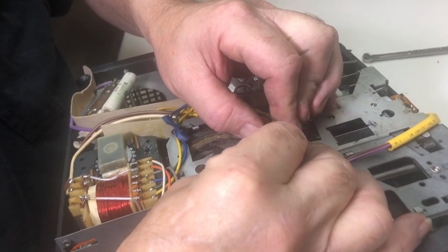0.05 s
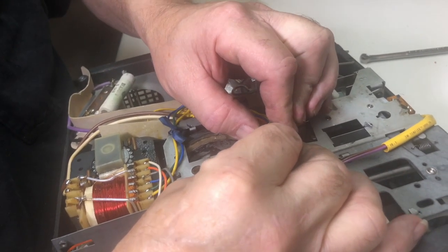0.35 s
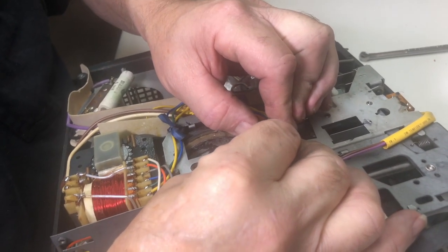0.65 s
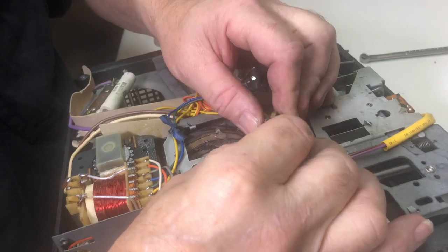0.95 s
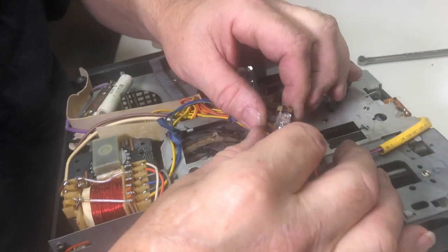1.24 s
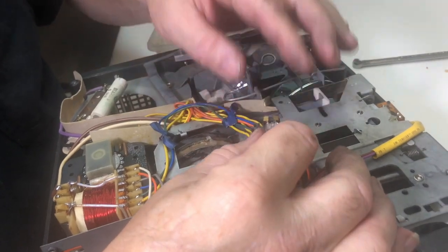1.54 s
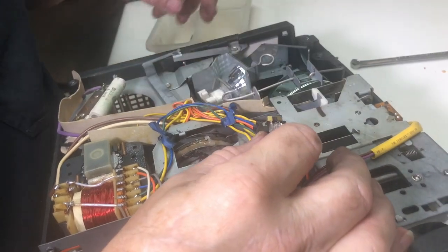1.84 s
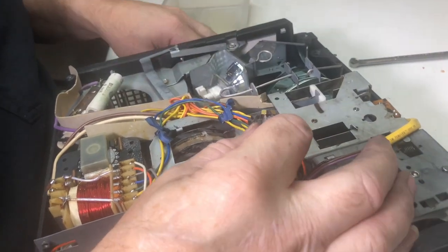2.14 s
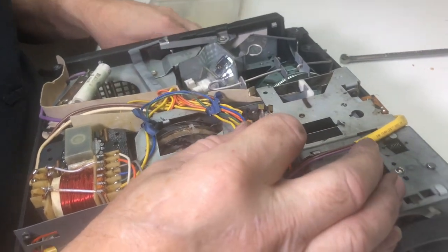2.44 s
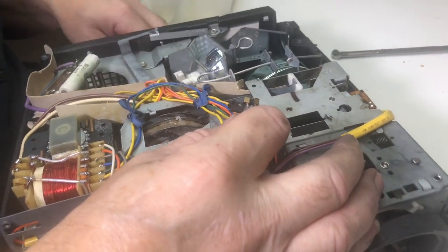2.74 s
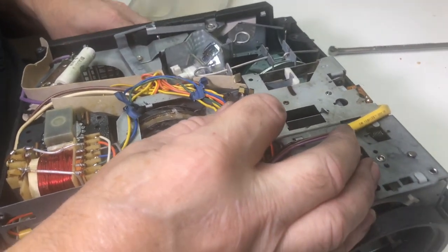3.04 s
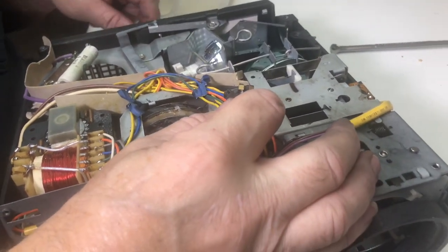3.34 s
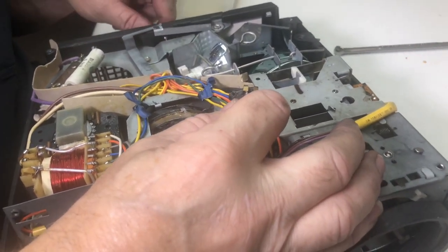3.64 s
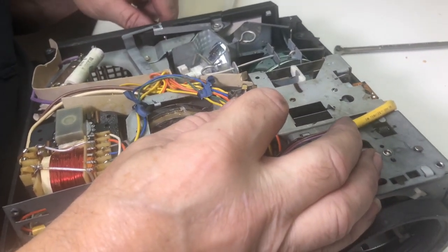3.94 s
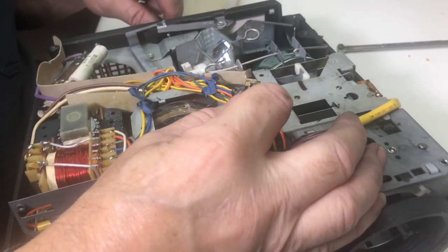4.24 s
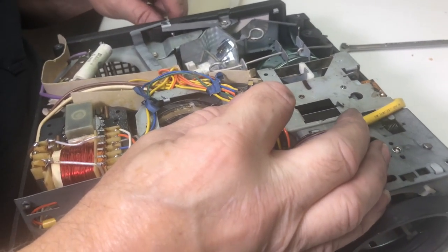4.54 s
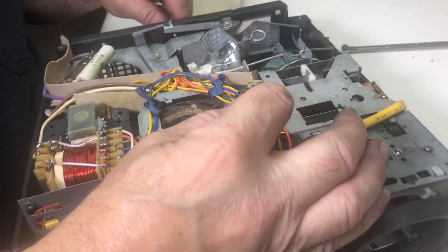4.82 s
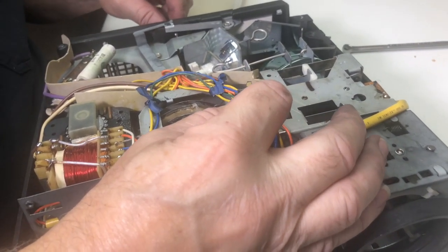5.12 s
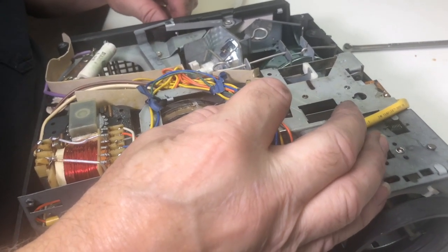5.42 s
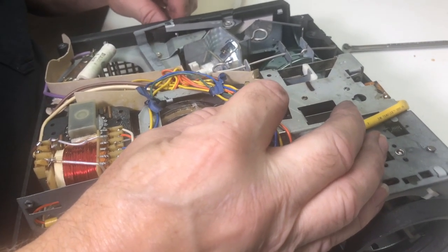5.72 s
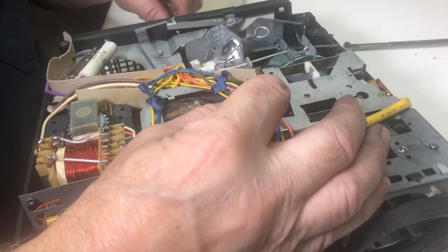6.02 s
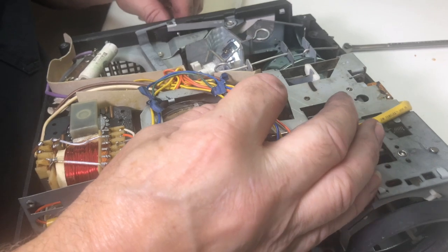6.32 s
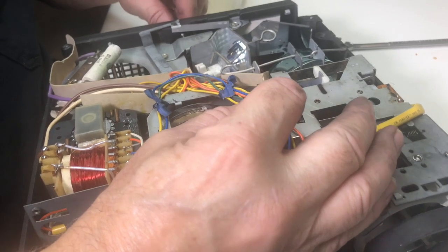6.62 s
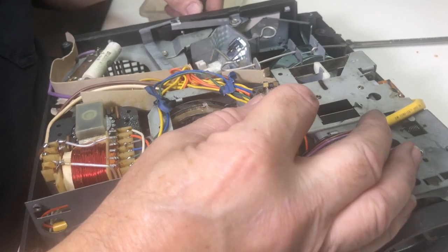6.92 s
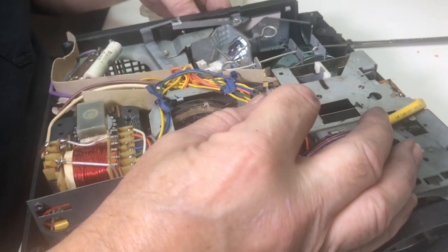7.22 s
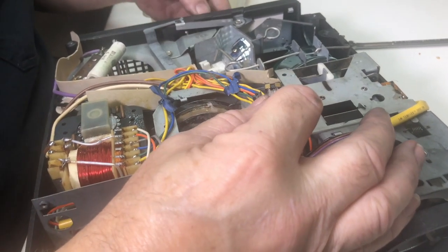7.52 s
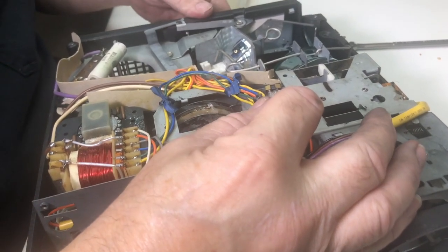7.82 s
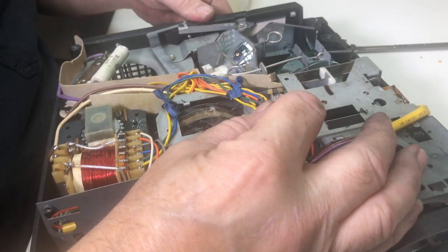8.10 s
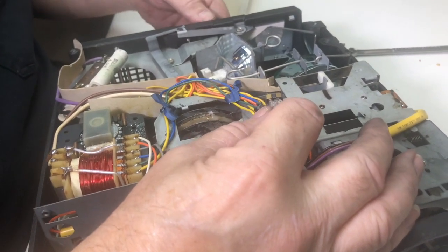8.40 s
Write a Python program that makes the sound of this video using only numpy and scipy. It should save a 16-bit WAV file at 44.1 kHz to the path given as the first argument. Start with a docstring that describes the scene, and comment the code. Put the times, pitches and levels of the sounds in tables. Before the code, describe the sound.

Hands work close by inside an opened slide projector in a small, slightly reverberant room, over a very faint steady hum and hiss. Soft finger ticks begin around 0.6 seconds, and the lamp clicks brightly in its socket at 1.1 seconds, followed by a lighter metal tick. A plastic control scrapes faintly, then gives a loud, dull knock at 2.3 seconds. A small springy click follows at 2.5 and a loud, sharp switch snap at 2.8, with light taps and scrapes until about 3.2 seconds. The control clicks again at 4.3 seconds, and a lighter metal click comes at 6. Around 6.5 seconds skin slides softly over the case, which rumbles slightly under a leaning hand. Quiet brushes of skin and sleeve and a few tiny taps continue until about 8.5 seconds.

```python
"""On a bench in a small room, hands work close by inside an opened slide projector.
Fingers click on the lamp and wiring; a control at the rim knocks, snaps over, and later clicks twice
more. Each impact excites the damped modes of the part it strikes. Skin and sleeve brush the housing
in stick-slip friction, and the case rumbles under a leaning hand.
The room reverberates, over a faint steady hum and hiss."""
import sys
import numpy as np
from scipy import signal
from scipy.fft import rfft, irfft, next_fast_len
from scipy.io import wavfile
from scipy.ndimage import map_coordinates

SR = 44100
rng = np.random.default_rng(int(sys.argv[2]) if len(sys.argv) > 2 else 0)


def unload_audio(sound):
    """Save the sound as a 16-bit wav file, at the path given as the first command line argument."""
    columns = np.transpose(np.atleast_2d(sound))
    # keep every value between -1 and 1, then stretch to whole-number steps
    steps = np.round(np.clip(columns, -1, 1) * 32767)
    wavfile.write(sys.argv[1], SR, steps.astype(np.int16))


N = 373086

# modes of the lamp clicking in its socket: f/Hz, width/Hz, relative level/dB
LAMP = [(796, 120, -16), (1200, 72, -10), (1670, 270, -6.5), (2150, 87, 2.5), (2830, 100, -8),
        (3110, 120, -4.5), (3630, 140, -11), (4730, 320, -3), (5860, 210, -4.5), (6840, 720, -9),
        (8500, 450, -12), (11750, 710, -6)]
# modes of a sprung metal contact: f/Hz, width/Hz, relative level/dB
SPRING = [(647.5, 100, -2.5), (1079, 100, 1), (1538, 100, -0.5), (1886, 73, -4), (2165, 120, -7),
          (3298, 170, -10), (3755, 180, -8), (4848, 120, -2), (5120, 60, -2.5), (8740, 400, -25.5)]
# modes of the plastic housing, a dull knock: f/Hz, width/Hz, relative level/dB
HOUSING = [(297, 23, -12), (385, 54, -7), (500, 60, -12), (576, 34, -9.5), (710, 37.5, -19),
           (1005.5, 110, 1.5), (1144, 140, -4.5), (1360, 120, -14), (1660, 150, -9), (1820, 130, -14),
           (2000, 90, -17.5), (2340, 250, -13), (2850, 48, -17.5), (3220, 65, -19), (4760, 180, -31.5),
           (5240, 300, -36)]
# modes of the switch, a sharp snap: f/Hz, width/Hz, relative level/dB
SWITCH = [(213.9, 20, -6.5), (277, 12, -11.5), (435.5, 77, -10.5), (550, 50, -13), (818, 65, -0.5),
          (1010, 120, -8), (1207, 80, -3), (1414, 90, -8), (1620, 70, -2.5), (1816, 69, -6.5),
          (1970, 70, 1.5), (2160, 150, -0.5), (2613, 70, -5), (2790, 41, -4), (3090, 73, -6),
          (3420, 60, -7.5), (3602, 66, -12), (3980, 160, -13), (4570, 60, -12.5), (4850, 200, -15.5),
          (5200, 90, -8), (6100, 99, -21), (8655, 150, -25.5)]
# modes of the control's detent: f/Hz, width/Hz, relative level/dB
DETENT = [(277, 44, -5), (378.5, 37, -1.5), (480, 29, -10.5), (665, 60, -11), (764, 22, -6.5),
          (910, 26, -2.5), (1150, 31, -9), (1320, 61, -6), (1510, 114, -4), (1937, 62, 3.5),
          (2300, 62, -3.5), (2680, 90, -9.5), (3400, 220, -13), (4330, 180, -20), (4960, 160, -28),
          (7800, 1700, -23)]


def amp(db):
    """Amplitude ratio of a level in decibels."""
    return 10 ** (np.asarray(db) / 20)


def unit(x):
    """Normalisation to rms 1."""
    return x / np.sqrt(np.mean(x ** 2) + 1e-20)


def unit_energy(x):
    """Normalisation to energy 1."""
    return x / (np.linalg.norm(x) + 1e-20)


def along(points, hz):
    """Interpolation of (f/Hz, value) points on a logarithmic frequency axis."""
    f, values = np.transpose(points)
    return np.interp(np.log(hz + 1), np.log(f + 1), values)


def lifts(peaks, hz):
    """Lorentzian resonance peaks, summed as a gain in dB."""
    return sum(db / (1 + (2 * (hz - centre) / width) ** 2) for centre, width, db in peaks)


def resonances(modes, hz, steep=1.2):
    """Power sum of band-pass modes, in dB; steep deepens the valleys between them."""
    shape = lambda f, width: (hz * width) ** 2 / ((hz ** 2 - f ** 2) ** 2 + (hz * width) ** 2)
    power = sum(amp(db) ** 2 * shape(f, width) ** steep for f, width, db in modes)
    return 10 * np.log10(power + 1e-12)


def wobble(rate):
    """Random modulation: linear interpolation of rate Gaussian values a second."""
    knots = rng.standard_normal(int(N * rate / SR) + 4)
    return map_coordinates(knots, [np.arange(N) * rate / SR], order=1)


def noise(colour, size=N):
    """White noise filtered by colour (dB against Hz); rms 1."""
    m = next_fast_len(size)
    spectrum = rfft(rng.standard_normal(m)) * amp(colour(np.fft.rfftfreq(m, 1 / SR)))
    return unit(irfft(spectrum, m)[:size])


def impulse(colour, size=4096):
    """Minimum-phase impulse response of colour (dB against Hz), by folding the cepstrum."""
    cepstrum = irfft(np.log(amp(colour(np.fft.rfftfreq(size, 1 / SR))) + 1e-6))
    cepstrum[1:size // 2] *= 2
    cepstrum[size // 2 + 1:] = 0
    return irfft(np.exp(rfft(cepstrum)))


def dying(t, t60):
    """Exponential decay of 60 dB in t60."""
    return np.exp(-np.log(1000) * t / np.maximum(t60, 1e-3))


def swells(rows, release_s):
    """Exponential envelopes: each gains 20 dB over its rise, then loses 20 dB per release_s."""
    t = np.arange(N) / SR
    return sum(amp(db - 20 * np.maximum((s - t) / rise, (t - s) / release_s)) for s, db, rise in rows)


def add(track, s, sound):
    """Superposition of a sound on the track at time s."""
    start = max(round(s * SR), 0)
    track[start:start + len(sound)] += sound[:max(N - start, 0)]


def room_tone():
    """Stationary noise: broadband air with two faint broad peaks, and a wavering narrow-band hum."""
    # air spectrum: f/Hz, relative level/dB
    air_spectrum = [(12, -39), (20, -11), (74, 1.5), (219, -7), (274, -7.5), (614, -18), (1230, -21),
                    (1500, -20), (1630, -23.5), (2270, -25.5), (12800, -36), (14300, -37), (15500, -47.5)]
    # peaks in the air noise: f/Hz, width/Hz, gain/dB
    air_peaks = [(266, 52, 2.5), (1500, 150, 3)]
    air_db, hum_db, waver_db = -68, -76, 1.5
    air = amp(air_db) * noise(lambda hz: along(air_spectrum, hz) + lifts(air_peaks, hz))
    hum = amp(hum_db + waver_db * wobble(3)) * noise(lambda hz: 2 * resonances([(65, 18, 0)], hz))
    return air + hum


def room(sound, wet_db):
    """Diffuse reverberation: a noise tail, 8 ms late, whose treble decays first."""
    # reverberation time: f/Hz, t60/s
    decay_times = [(150, .38), (1000, 0.35), (4500, 0.26), (12000, .22)]
    hz, t, spectra = signal.stft(rng.standard_normal(SR // 2), SR, nperseg=256)
    tail = signal.istft(spectra * dying(t, along(decay_times, hz)[:, None]), SR, nperseg=256)[1]
    return amp(wet_db) * signal.fftconvolve(sound, np.pad(unit_energy(tail), (round(.008 * SR), 0)))


def flexing():
    """Flexure under load: the case rumbles whenever a hand leans on it."""
    # presses: peak t/s, level/dB, rise/s
    presses = [(1.22, -59.5, 0.1), (4.345, -58.5, 0.1), (6.69, -52.5, 0.19)]
    # spectrum of the loaded case: f/Hz, relative level/dB
    rumble = [(25, -23), (55, -4.5), (85, 10.5), (130, -5), (200, -15.5), (400, -25), (900, -67)]
    return swells(presses, release_s=.19) * noise(lambda hz: along(rumble, hz))


def friction(colour, size=N, grit_db=2.5):
    """Stick-slip friction: tiny slips of uneven strength excite the panel resonances; rms 1."""
    # panel resonances: f/Hz, width/Hz, gain/dB
    panels = [(450, 110, 3.5), (1185, 190, 6), (1518, 160, 5), (1900, 150, 5), (2277, 240, 7.5),
              (3155, 490, 10), (4250, 200, 7), (6290, 250, 9), (6923, 200, 6.5), (7285, 320, 5),
              (7929, 250, 7), (8500, 260, 7), (9457, 91, 7.5), (10803, 290, 8), (11990, 350, 7)]
    strength = amp(grit_db * np.clip(rng.standard_normal(size // 64 + 1), -2, 2.3))
    slips = rng.standard_normal(size) * np.repeat(strength, 64)[:size]
    response = impulse(lambda hz: colour(hz) + lifts(panels, hz))
    return unit(signal.fftconvolve(slips, response)[:size])


def brushing():
    """Brief sliding friction: fingertips brush the case, swelling slowly and letting go quickly."""
    # strokes: t/s, duration/s, level/dB, tilt/(dB per octave)
    strokes = [(.92, 0.035, -69, 3), (2.25, .032, -49.5, -3), (2.332, 0.054, -55.5, -4),
               (2.499, .05, -57, -3), (2.569, 0.021, -60.5, -1), (2.607, 0.052, -61, -1),
               (2.897, 0.06, -49.5, -3.5), (3.659, 0.058, -69.5, 8), (3.761, 0.041, -65.5, 5.5),
               (3.92, 0.081, -71, 4), (4.299, 0.018, -55, 3), (5.66, .17, -78, 1), (6.83, .065, -64, 3),
               (7.101, 0.048, -61.5, 0), (7.133, 0.044, -66.5, -2), (7.174, 0.063, -68, -2.5),
               (7.264, 0.058, -64, -0.5), (7.378, .085, -69.5, 0), (7.561, 0.084, -54, 0),
               (7.754, 0.042, -66.5, 0.5), (7.847, .11, -75.5, 0), (8.369, 0.12, -63.5, 2)]
    # brushing spectrum: f/Hz, relative level/dB
    brush = [(120, -47.5), (200, -2), (575, -6), (1190, -4), (2650, -8.5), (3120, -7.5), (3820, -9.5),
             (15500, -29.5)]
    track = np.zeros(N)
    for s, duration, db, tilt in strokes:
        size = int(duration * SR)
        hiss = friction(lambda hz: along(brush, hz) + tilt * np.log2(np.clip(hz, 500, 9000)), size)
        envelope = np.sin(np.pi * np.linspace(0, 1, size) ** 1.9)
        add(track, s, amp(db) * hiss * envelope)
    return track


def control_scrape():
    """Friction under rising force: the control scrapes as fingers push it until it gives."""
    # pushes: peak t/s, level/dB, rise/s
    pushes = [(2.28, -60.5, .42), (2.58, -66, .2), (2.99, -60, .2), (3.21, -66.5, .25)]
    # spectrum of scraping plastic: f/Hz, relative level/dB
    plastic = [(120, -37.5), (200, -4.5), (405, -3.5), (800, -1.5), (2060, -11.5), (2700, -6.5),
               (3150, -22), (3730, -22.5), (4890, -18.5), (7420, -25), (15000, -36)]
    scrape = unit(friction(lambda hz: along(plastic, hz)) * amp(1.5 * wobble(49)))
    return swells(pushes, release_s=.12) * scrape


def hand_slide():
    """Sustained friction: skin slides over the case as the hand shifts its grip."""
    # spectrum of sliding skin: f/Hz, relative level/dB
    skin = [(150, -35.5), (250, -1.5), (420, -9.5), (795, -6), (961, -14.5), (3220, -10.5), (4710, -17),
            (6770, -21.5), (15500, -36)]
    start_s, rise_s, hold_s, release_s, level_db = 6.435, .081, .2, .068, -62
    corners = start_s + np.cumsum([0, rise_s, hold_s, release_s])
    envelope = np.interp(np.arange(N) / SR, corners, [0, 1, 1, 0])
    rub = unit(friction(lambda hz: along(skin, hz)) * amp(2.4 * wobble(120)))
    return amp(level_db) * envelope * rub


def scattered(sound, t60, scatter_db):
    """Multiple scattering: the direct sound, then dense reflections inside the open case."""
    t = np.arange(SR // 10) / SR
    reflections = rng.standard_normal(len(t)) * dying(t, t60) * (1 - dying(t, .011))
    paths = amp(scatter_db) * unit_energy(reflections)
    paths[0] += 1  # direct path
    return signal.fftconvolve(sound, paths)


def finger_clicks():
    """Impulsive excitation of the chassis: place sets the main ring, fingertip the lows, nail the highs."""
    # contacts: t/s, relative level/dB, ring f/Hz, fingertip thud/dB, nail treble/dB
    contacts = [(0.586, -56.5, 1740, -10, -38), (0.906, -57.5, 1800, -22, -16), (0.941, -61, 2260, -22, 3),
                (1.016, -59, 1860, 3, -7.5), (1.222, -58, 750, 9, -18), (1.292, -61.5, 640, 7, -20),
                (1.603, -65, 1070, 7, -1), (1.746, -54.5, 795, 18.5, -10), (1.831, -55, 780, 24, -10),
                (2.053, -50.5, 1050, 2, -20), (2.118, -59.5, 1630, 3, -20),
                (2.5492, -36.5, 2000, -19, -20.5), (2.618, -44, 2000, -20, -20),
                (2.7315, -45.5, 845, 12, -13), (2.7468, -38.5, 1740, 2, -1.5),
                (2.9194, -40, 1030, 5.5, -11), (2.987, -47.5, 2580, 7, -16.5),
                (3.136, -44.5, 1905, -6, -24), (3.2204, -61, 890, 12.5, -10.5), (3.669, -60.5, 828, 4, -11),
                (3.797, -57.5, 990, 10, -12), (4.0687, -53.5, 1620, 1.5, -9.5), (6.212, -63, 2805, 14, -3),
                (6.4542, -60.5, 3200, -11, -2.5), (6.849, -51, 676, 11, -3), (7.11, -57.5, 3170, 5, -2),
                (7.433, -60, 1270, 2, -5), (8.348, -57.5, 1970, 9.5, -7.5)]
    # chassis resonances: f/Hz, width/Hz, gain/dB
    chassis = [(389.7, 40, 6.5), (618.7, 26, 7.5), (793, 130, 6), (1130, 130, 4), (1490, 130, 4.5),
               (1916, 320, 6), (2400, 170, 2.5), (2650, 180, 3.5), (3180, 130, 5.5), (4830, 170, 5),
               (6230, 160, 4), (8450, 300, 4.5), (9100, 350, 5.5), (11500, 200, 7)]
    track = np.zeros(N)
    for s, db, ring_hz, thud_db, treble_db in contacts:
        hollow_db = 2 + .3 * thud_db  # more fingertip wakes more of the hollow body
        crack_db = -14 + .75 * treble_db  # more nail gives more crack
        contact = [(40, thud_db - 22), (200, thud_db), (420, thud_db - 1),
                   (700, hollow_db), (1200, hollow_db), (1700, 2.5), (3300, -6),
                   (5000, treble_db), (7000, crack_db + 5), (15000, crack_db - 5)]
        peaks = chassis + [(ring_hz, 200, 4)]
        ring = impulse(lambda hz: along(contact, hz) + lifts(peaks, hz))
        click = amp(db + 23) * unit_energy(scattered(ring, t60=.047, scatter_db=8.5))
        add(track, s, click)
        add(track, s, room(click, wet_db=-11))
    return track


def modal_ring(modes, blur=1, travel_s=.0011):
    """Modal impulse response with dispersion, energy 1; blur widens the modes."""
    skirts = [(30, -19), (180, 3), (6000, .5), (9000, -8.5), (15000, -18.5)]  # f/Hz, gain/dB
    widened = [(f, width * blur, db) for f, width, db in modes]
    ring = impulse(lambda hz: resonances(widened, hz) + along(skirts, hz))
    # bending waves cross the panel treble first; 1 kHz takes travel_s
    phase_lag = 4 * np.pi * travel_s * np.sqrt(1000 * np.fft.rfftfreq(len(ring), 1 / SR))
    return unit_energy(irfft(rfft(ring) * np.exp(-1j * phase_lag)))


def impacts():
    """Damped free vibration: lamp, contacts and control ring in their modes under a short crack."""
    # blows: t/s, modes, level/dB, crack/dB, crack t60/s, reflections/dB, reflections t60/s, room/dB
    blows = [(1.1284, LAMP, -12.5, -12, 0.038, 0, 0.034, -17.5),
             (1.2, SPRING, -26, -11, .03, -3, 0.053, -19),
             (2.2844, HOUSING, 4, -24, 0.049, -10, 0.039, -20),
             (2.481, SPRING, -21.5, -11.5, 0.071, 3, 0.043, -9),
             (2.766, SWITCH, 2.5, -11.5, 0.049, -8, 0.033, -17),
             (4.3118, DETENT, -11, -11, 0.059, 5, 0.041, -17.5),
             (5.9672, SPRING, -24.5, -11, 0.038, 2, .04, -13.5),
             (5.9701, SPRING, -21.5, -10.5, .03, 5, 0.066, -15)]
    # crack spectrum: f/Hz, relative level/dB
    crack_spectrum = [(200, -13.5), (1500, 2.5), (5000, .5), (7000, -8), (10500, -10.5), (15000, -20)]
    track, t = np.zeros(N), np.arange(SR // 10) / SR
    for s, modes, db, crack_db, crack_t60, scatter_db, scatter_t60, wet_db in blows:
        body = unit_energy(scattered(modal_ring(modes), scatter_t60, scatter_db))
        crack = noise(lambda hz: along(crack_spectrum, hz), len(t))
        add(track, s, amp(db) * body)
        add(track, s, amp(db + crack_db) * unit_energy(crack * dying(t, crack_t60)))
        # the room gathers sound from every panel, so single modes stand out less in its tail
        add(track, s, amp(db) * room(modal_ring(modes, blur=6), wet_db))
    return track


def scene():
    """Superposition of impacts, friction and flexure over the quiet room, in mono."""
    rubs = brushing() + control_scrape() + hand_slide()
    handling = finger_clicks() + impacts() + rubs + room(rubs, wet_db=-11.5)[:N] + flexing()
    return (handling + room_tone())[None]


def record(dry):
    """Band limiting by an ideal low-pass filter."""
    cutoff_hz = 15600
    m = next_fast_len(N + SR // 2)
    return irfft(rfft(dry, m) * (np.fft.rfftfreq(m, 1 / SR) < cutoff_hz), m)[..., :N]


dry = scene()
out = record(dry)
unload_audio(out)
```